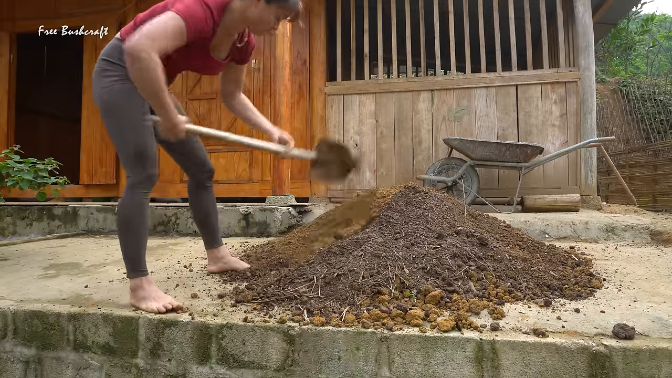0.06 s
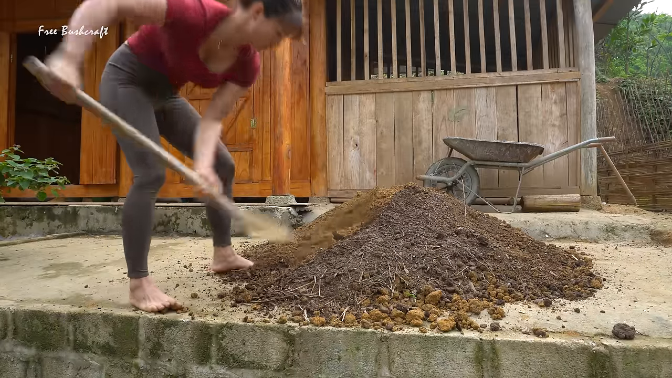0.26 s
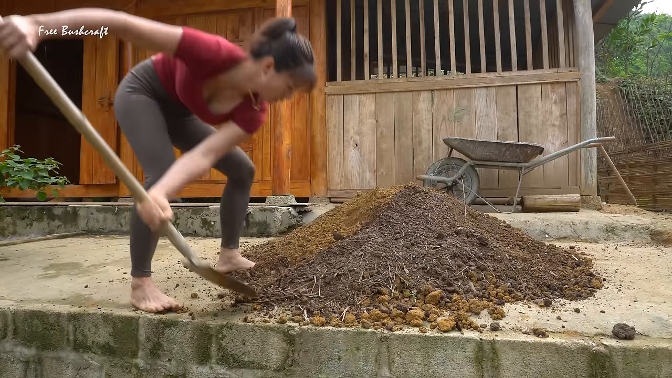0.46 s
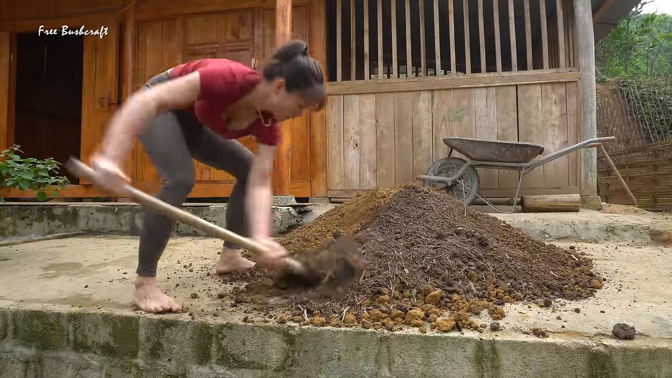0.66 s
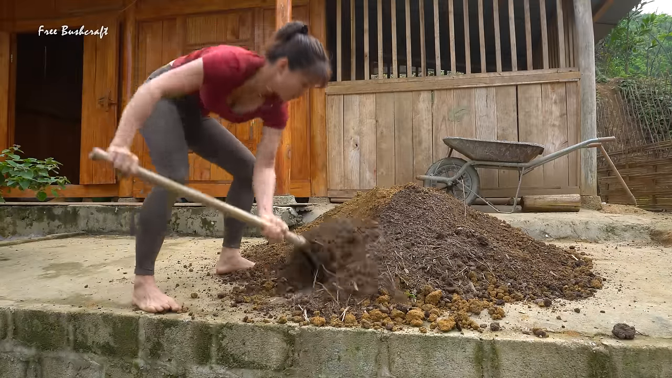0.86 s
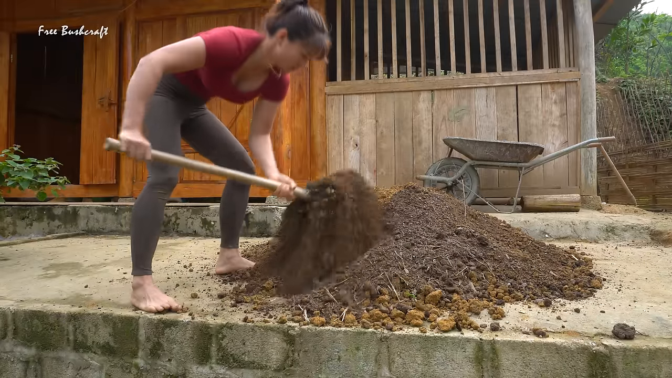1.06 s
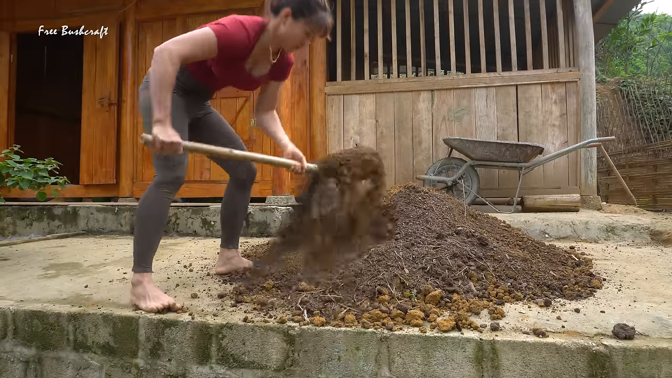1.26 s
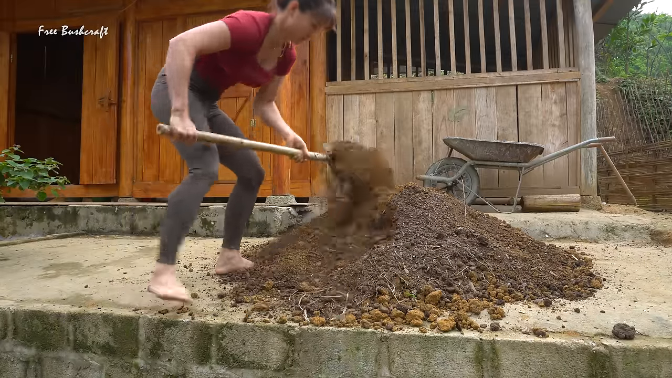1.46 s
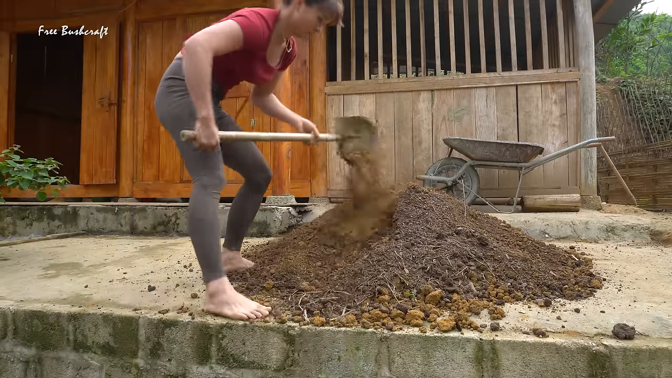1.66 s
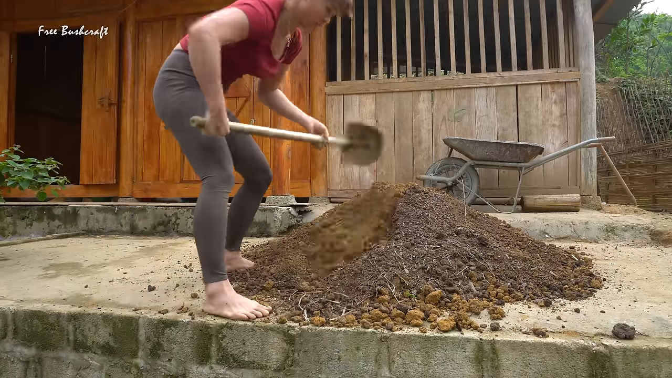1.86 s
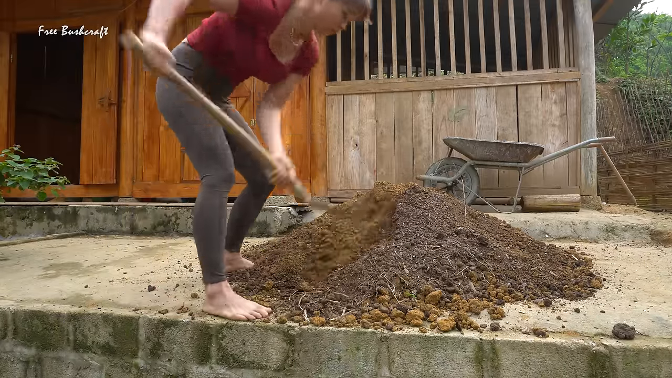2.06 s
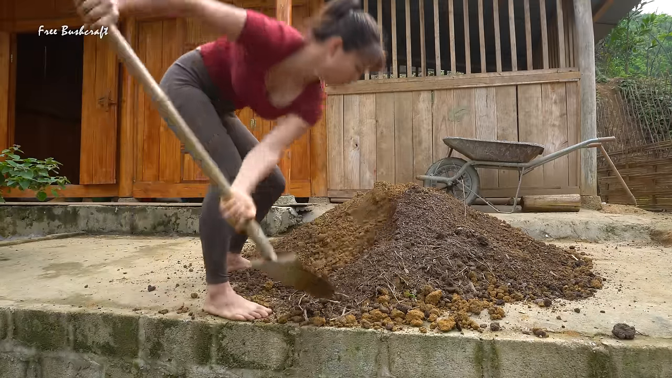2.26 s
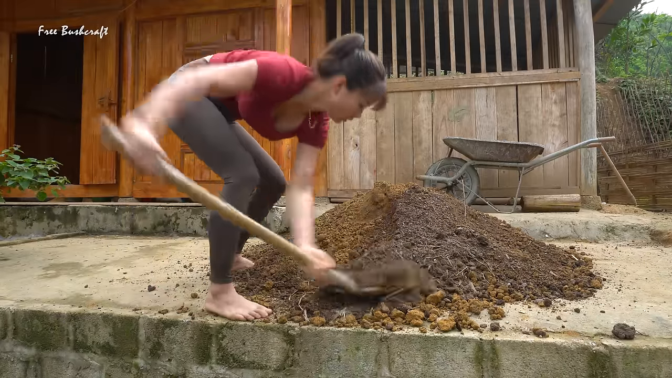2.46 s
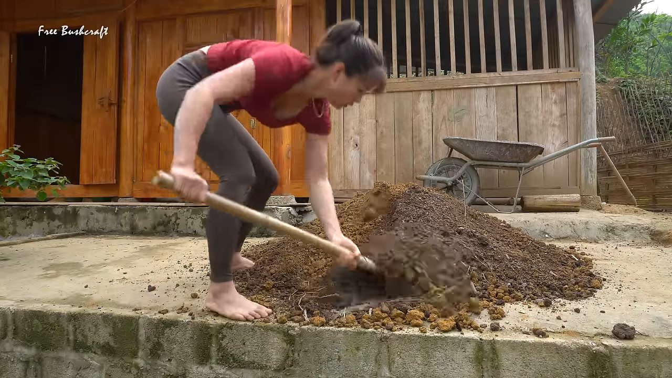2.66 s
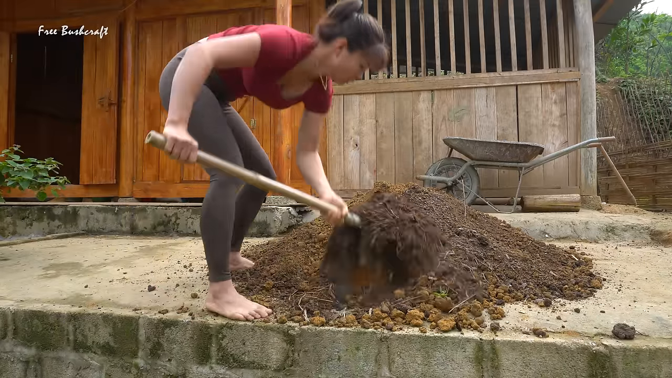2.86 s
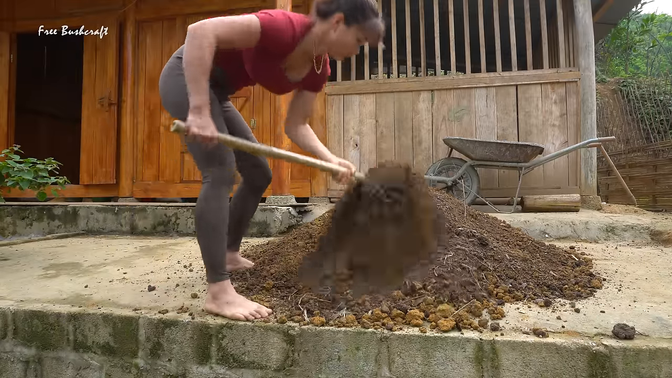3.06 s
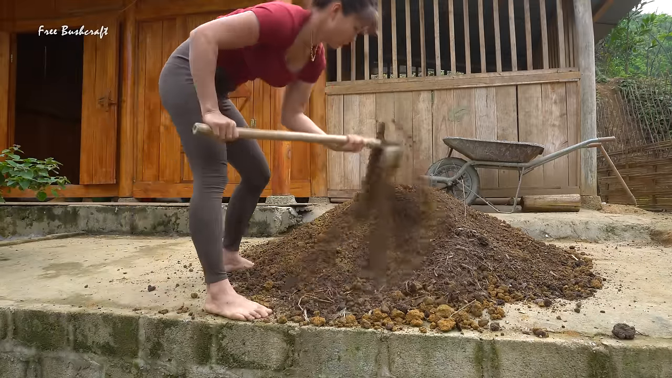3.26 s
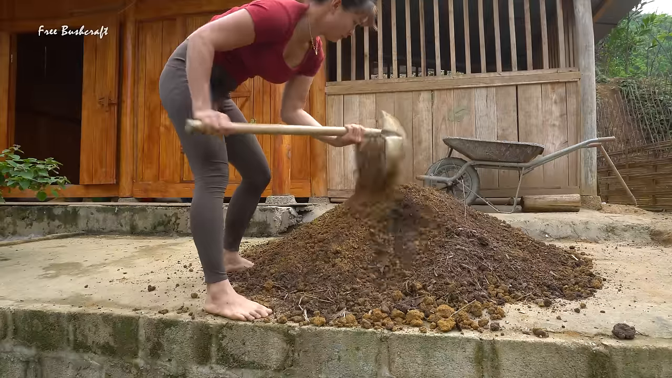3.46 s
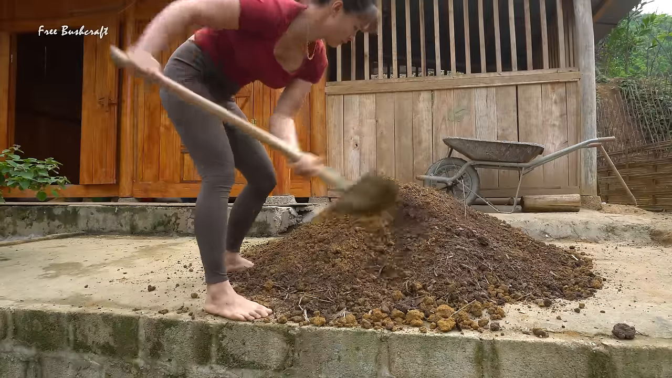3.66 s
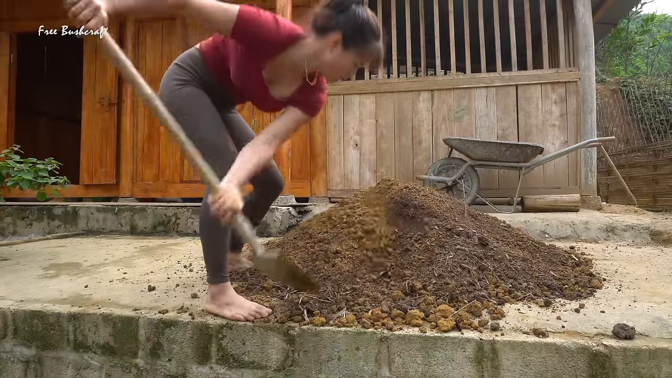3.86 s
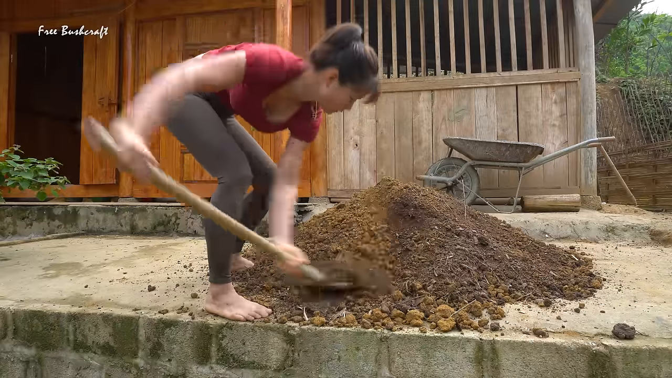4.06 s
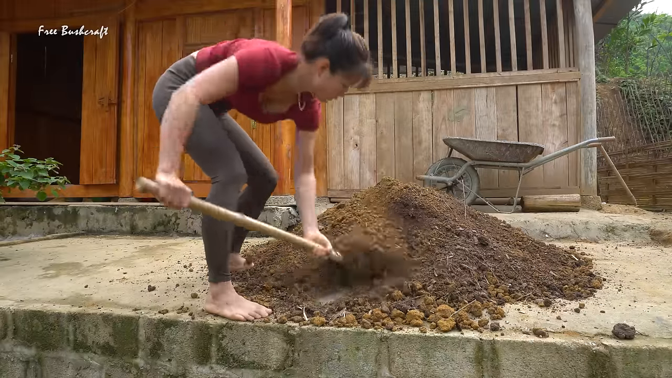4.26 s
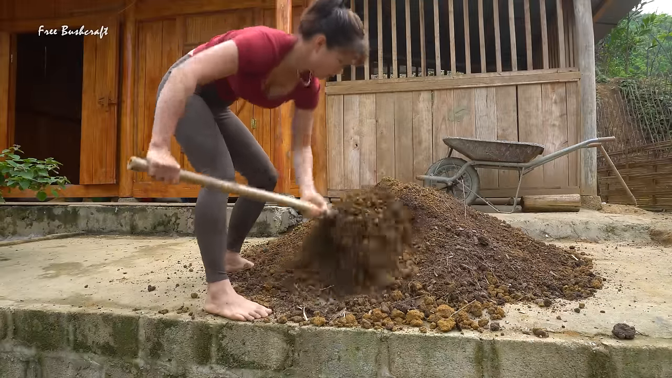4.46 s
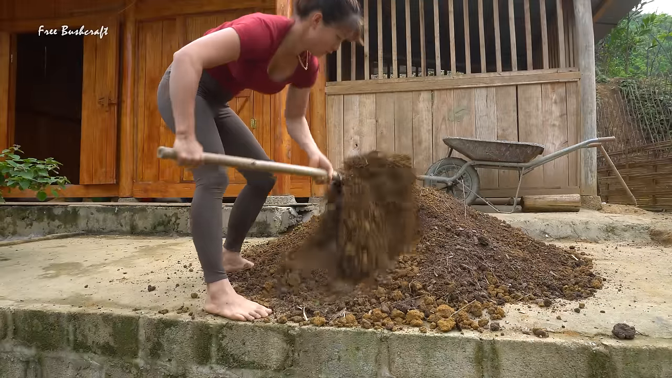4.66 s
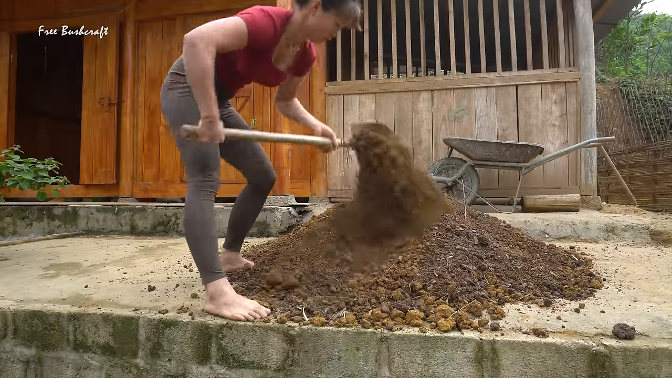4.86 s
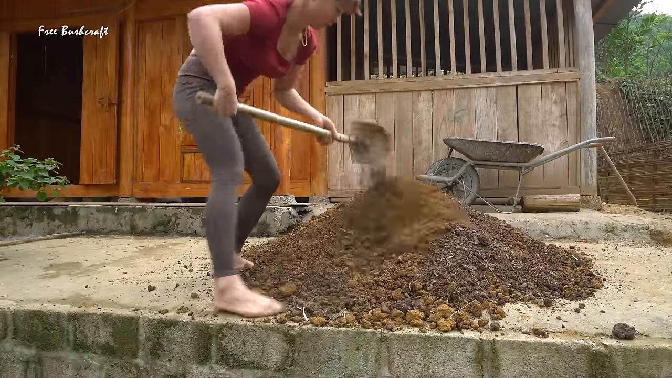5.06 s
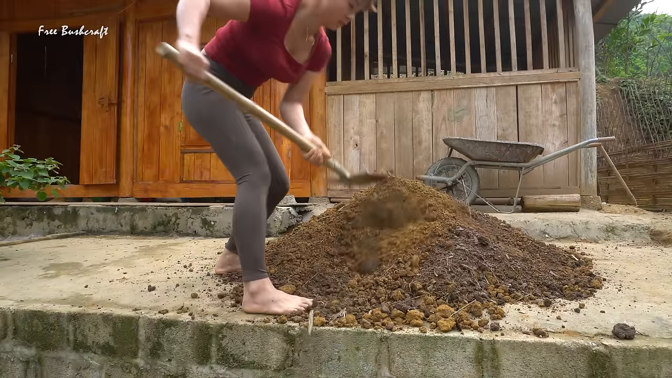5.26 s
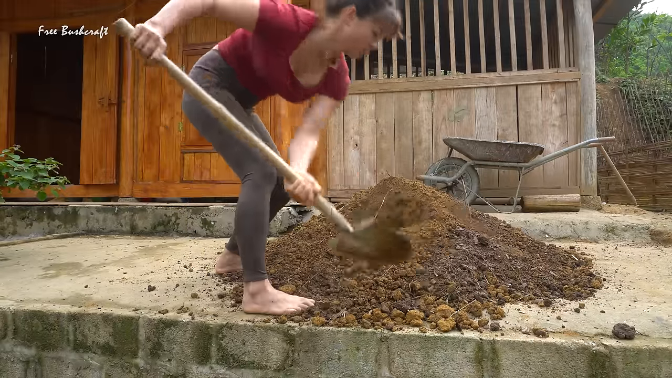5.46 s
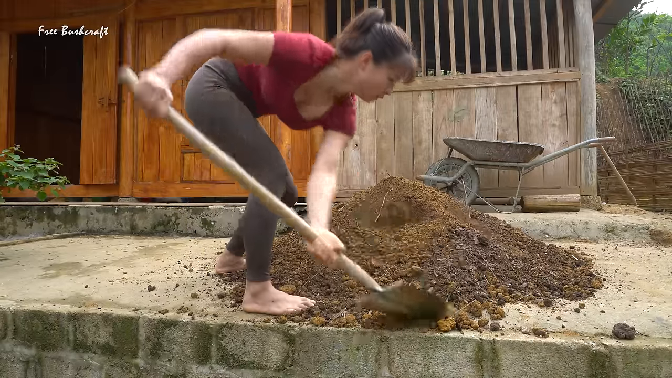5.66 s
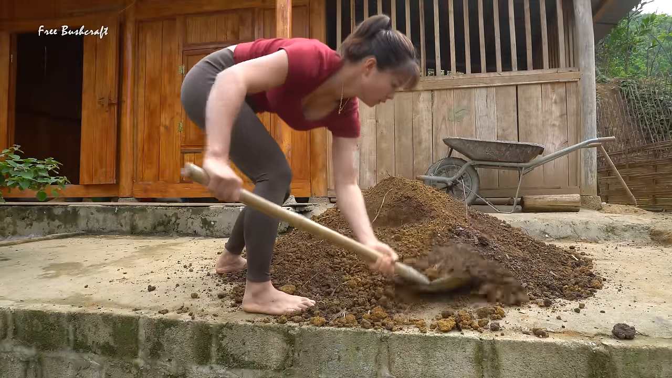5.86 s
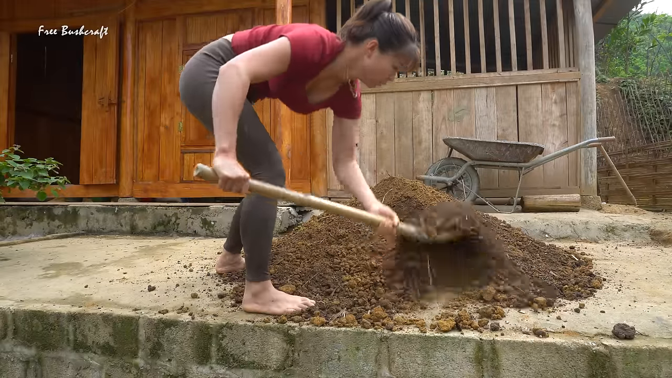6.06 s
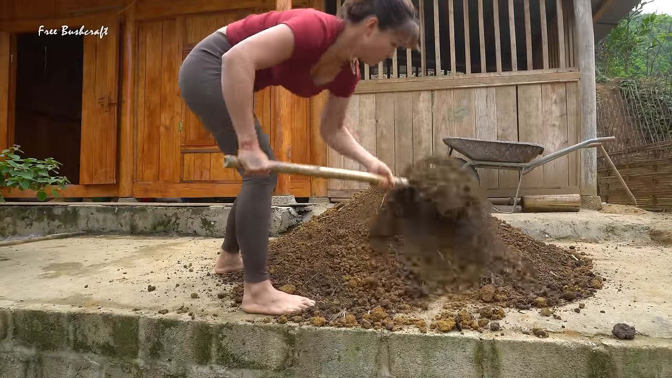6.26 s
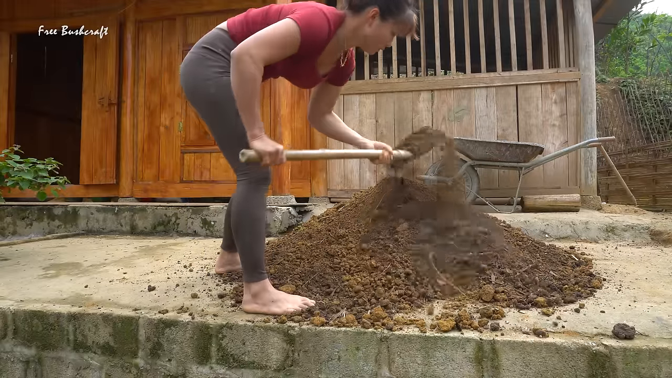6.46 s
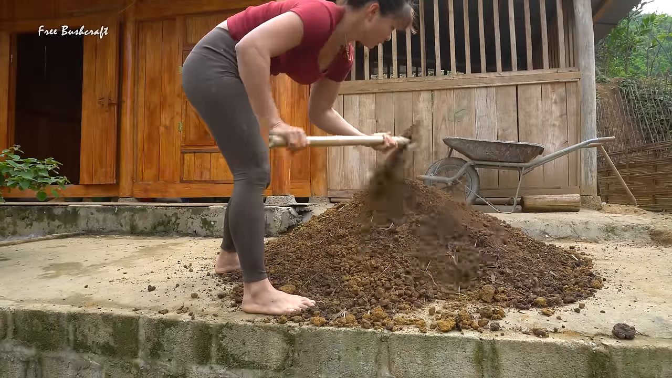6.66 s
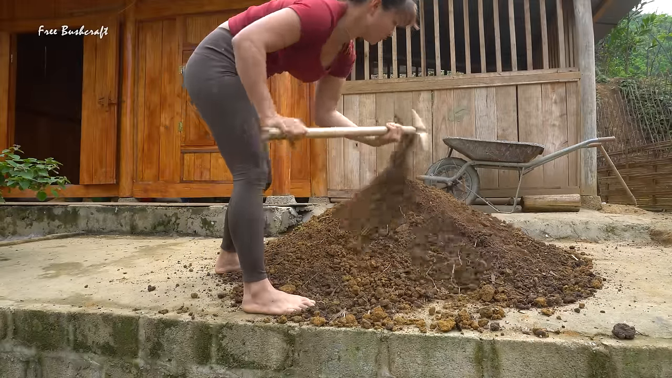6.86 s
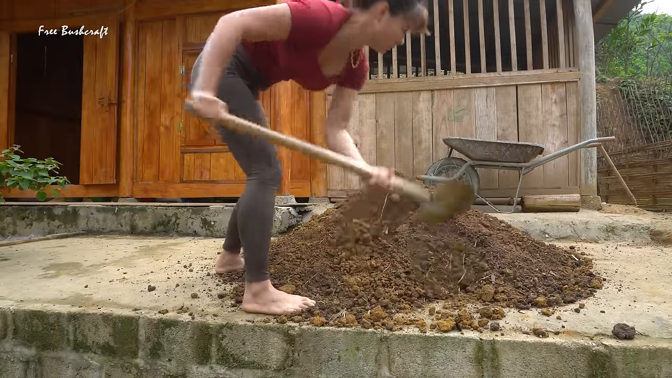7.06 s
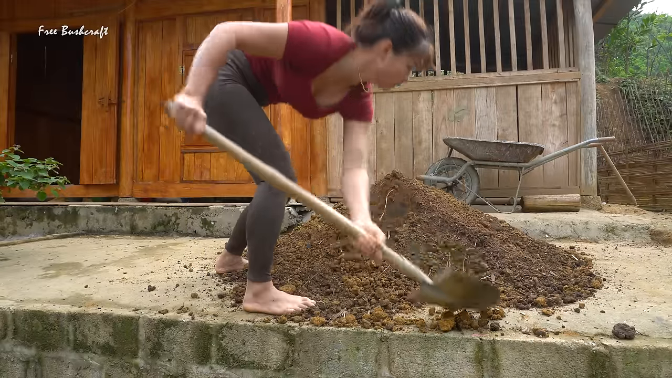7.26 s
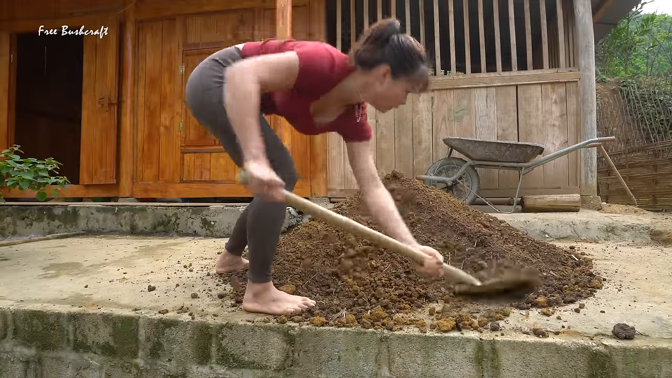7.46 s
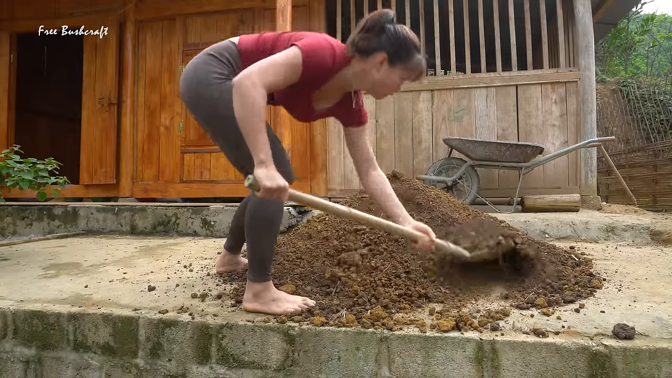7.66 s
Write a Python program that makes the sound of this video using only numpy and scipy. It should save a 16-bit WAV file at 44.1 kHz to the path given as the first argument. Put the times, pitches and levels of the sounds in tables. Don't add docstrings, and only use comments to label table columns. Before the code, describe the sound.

Five short gritty shovel scrapes on a concrete slab, with pebbles clicking and soil spilling, among birdsong, peeping chicks and soft hen clucks outdoors.

```python
import sys
import numpy as np
from scipy import signal
from scipy.fft import rfft, irfft, next_fast_len
from scipy.io import wavfile
from scipy.ndimage import uniform_filter1d, map_coordinates

SR = 44100
rng = np.random.default_rng(int(sys.argv[2]) if len(sys.argv) > 2 else 0)


def master_out(mix):
    frames = np.transpose(np.atleast_2d(mix))
    ceiling = np.clip(frames, -1, 1)
    pcm = np.round(ceiling * 32767).astype(np.int16)
    wavfile.write(sys.argv[1], SR, pcm)


def gain_from_decibels(decibels):
    exponent = np.asarray(decibels, float) / 20
    return 10 ** exponent


N = 340452


def unit(x):
    return x / np.sqrt(np.mean(x ** 2) + 1e-20)


def along(points, hz):
    f, v = np.transpose(points)
    return np.interp(np.log(hz + 1), np.log(f + 1), v)


def wobble(rate, size):
    knots = rng.standard_normal(int(size * rate / SR) + 4)
    return map_coordinates(knots, [np.arange(size) * rate / SR])


def filtered(x, response):
    m = next_fast_len(x.shape[-1] + 8192)
    spectrum = rfft(x, m) * response(np.fft.rfftfreq(m, 1 / SR))
    return irfft(spectrum, m)[..., :x.shape[-1]]


def band(x, lo_hz, hi_hz):
    return unit(filtered(x, lambda f: 1 / np.sqrt((1 + (lo_hz / (f + 1)) ** 8) * (1 + (f / hi_hz) ** 8))))


def spread(pair, alike):
    turn = lambda hz: np.arccos(np.clip(along(alike, hz), -1, 1)) / 2
    mid, side = filtered(pair, lambda hz: np.array([np.cos(turn(hz)), np.sin(turn(hz))]))
    return np.array([mid + side, mid - side])


def lean(db):
    return gain_from_decibels(np.multiply.outer([.5, -.5], np.atleast_1d(db)))


def add(out, s, x):
    part = out[..., round(s * SR):][..., :x.shape[-1]]
    part += x[..., :part.shape[-1]]


def crunch(size, share, spike_db):
    grains = (rng.random(size) < share) * gain_from_decibels(spike_db * np.minimum(rng.exponential(size=size), 3))
    return rng.standard_normal((2, size)) * (1 + grains)


def patches(x, wide, long, depth_db):
    z = signal.stft(x, nperseg=128)[2]
    field = uniform_filter1d(rng.standard_normal(z.shape[1:]), wide, axis=0)
    field = uniform_filter1d(field, long, axis=1)
    return signal.istft(z * gain_from_decibels(depth_db * unit(field)), nperseg=128)[1][:, :x.shape[-1]]


# [f/Hz, t60/s]
WALL_DECAY = [(300, 0.04), (3000, 0.31), (10000, 0.35)]


def walls(x, stretch):
    hz, t, z = signal.stft(rng.standard_normal((2, SR // 2)), SR, nperseg=256)
    t60 = stretch * along(WALL_DECAY, hz)[:, None]
    tail = signal.istft(z * gain_from_decibels(-60 * t / t60), SR, nperseg=256)[1]
    delayed = np.pad(x, (300, 0))[None]
    return signal.fftconvolve(delayed, tail / np.linalg.norm(tail[0]), axes=1)[:, :N]


# [t/s, level/dB]
AIR_STIR = [(0.0, -57), (1.61, -58.5), (2.49, -52), (2.66, -58), (3.14, -60.5), (4.21, -57.5),
            (4.56, -61.5), (5.76, -58.5), (5.89, -66), (6.06, -61.5), (6.47, -60.5), (7.72, -59.5)]
# [f/Hz, level/dB per Hz]
AIR_COLOUR = [(15, -40), (25, -7.5), (108, -3.5), (137, -7), (503, -6), (560, -7), (1160, -6.5),
              (1650, -7.5), (3520, -10), (4140, -10), (5880, -9.5), (12200, -7), (16000, -11)]
# [f/Hz, left-right likeness]
AIR_ALIKE = [(40, .995), (240, .97), (950, .7), (3800, .15), (15000, .15)]
# [f/Hz, left-right level/dB]
AIR_LEAN = [(100, 0), (950, 2.5), (3800, .5), (15000, 5)]
# [f/Hz, width/Hz, level/dB, from t/s, to t/s]
DRONES = [
    (558, 27, -68, 4.5, 8.3),
    (910, 30, -59, 0.5, .6),
]
# [t/s, f/Hz, level/dB]
MOTOR = [
    [(0.7, 112.3, -66), (3.92, 107.6, -68.5), (4.05, 101, -81)],
    [(5.1, 89, -73), (5.27, 106.7, -67.5), (5.8, 112.3, -68)],
]
SOIL_DB, SOIL_FOLLOWS = -53.5, 0.55
HISS_DB, HISS_FOLLOWS = -56, 0.44
SLIDE_DB, SLIDE_S = 10, 0.11


def yard():
    time = np.arange(N) / SR
    air_db = np.interp(time, *np.transpose(AIR_STIR))
    slides = sum(np.exp(-((time - enters) / SLIDE_S) ** 2) for _, _, enters, *_ in LOADS)
    soil_db = SOIL_DB + SOIL_FOLLOWS * (air_db + 59.5) + SLIDE_DB * slides
    hiss_db = HISS_DB + HISS_FOLLOWS * (air_db + 59)

    colour = lambda f: gain_from_decibels(along(AIR_COLOUR, f)) * lean(along(AIR_LEAN, f))
    raw = filtered(spread(crunch(N, share=.002, spike_db=4), AIR_ALIKE), colour)
    raw = patches(raw, 2, 30, depth_db=1.7)
    out = band(raw, 28, 1200) * gain_from_decibels(air_db + 1.5 + 1.3 * wobble(9, size=N))
    out += band(raw, 1680, 4330) * gain_from_decibels(soil_db + 0.79 * wobble(25, size=N))
    out += band(raw, 5000, 25500) * gain_from_decibels(hiss_db + 0.91 * wobble(24, size=N))

    for hz, width_hz, db, start, end in DRONES:
        size = round((end - start) * SR)
        hum = unit(filtered(rng.standard_normal(size), lambda f: 1 / (1 + ((f - hz) / width_hz) ** 2)))
        add(out, start, hum * gain_from_decibels(db + 3 * wobble(5, size=size)) * signal.windows.tukey(size, .3))
    for rows in MOTOR:
        s, hz, db = np.transpose(rows)
        t = np.arange(s[0], s[-1], 1 / SR)
        level = gain_from_decibels(np.interp(t, s, db) + 2.5 * wobble(6.6, size=len(t)))
        phase = 2 * np.pi * np.cumsum(np.interp(t, s, hz)) / SR
        add(out, s[0], np.sqrt(2) * level * signal.windows.tukey(len(t), .15) * np.sin(phase))
    return out


HOLLOWS = [555, 900, 1630, 1640, 1900]


def patter():
    out, t = np.zeros((2, N)), np.arange(SR // 8) / SR
    for when, pitch, big, side, life in rng.random((300, 5)):
        if life > .7:
            hz = HOLLOWS[int(pitch * len(HOLLOWS))] * (.98 + .04 * side)
        else:
            hz = 600 * 7 ** pitch
        decay = gain_from_decibels(-60 * t / (0.012 + 0.15 * life ** 3))
        ping = np.sin(2 * np.pi * hz * t) * decay * (1 - np.exp(-t / 0.002))
        add(out, when * N / SR, gain_from_decibels(-59 + 13 * big ** 2 - 6 * life) * ping * lean(8 * side - 3))
    return out


# [f/Hz, left-right likeness]
GRIT_ALIKE = [(60, 1), (600, 0.99), (1600, 1), (4000, 0.89), (8000, 0.66), (15000, 0.97)]
# [t/s, peak level/dB, knock f/Hz, sparkle level/dB re crack, left-right level/dB]
TICKS = [(0.14, -44, 2370, -14, 4), (0.156, -35.5, 2950, -23, -3), (0.164, -39, 2900, -17, -0.5),
         (0.2017, -30, 1970, -3, 7), (0.2545, -30.5, 1540, -22, 7), (1.206, -47, 3230, -23, -2.5),
         (1.4727, -29, 2970, -10, 2), (2.023, -34, 2050, -25, -8), (2.0732, -32.5, 1990, -18, -16),
         (2.131, -34, 3480, -5, -10), (2.2091, -32, 2100, -17, -4), (2.2202, -28, 2260, -20, -13),
         (2.228, -36, 3200, -17, -3), (2.2842, -36, 2230, -17, -10), (3.3354, -40, 1270, 3.5, 13),
         (3.3895, -39, 1870, -19, 10), (3.5065, -37, 1630, -14, 4.0), (3.7174, -35.5, 3910, -9, 1),
         (4.497, -51, 1630, -22, 13), (4.8265, -30.5, 2820, -5, 1), (4.8537, -50, 1400, -6, 5),
         (4.9098, -38.5, 2000, -9, 1.0), (5.0328, -34.5, 1480, -20, -4), (5.1518, -23.5, 3180, -6, 4),
         (5.4334, -40, 1360, -22, -9), (5.57, -53, 2920, 6, 15), (5.5822, -73, 2290, -12, 12),
         (5.697, -65, 1560, -8, 4), (5.707, -41, 2930, -9, -9), (5.7248, -41, 2730, 7, -4),
         (6.1894, -55, 2340, -14, 4), (6.5382, -29.5, 2800, -11, 2), (6.823, -26.5, 3090, -22, -1),
         (7.369, -23.5, 3260, -6, -1), (7.377, -27.5, 2080, -8, 3), (7.3958, -30, 3330, -4, -3)]
# [t/s, peak level/dB]
RINGS = [
    (0.2033, -31),
    (0.2542, -26.5),
    (5.1515, -29.5),
]
# [f/Hz, level/dB, time/s to fall by 75 dB]
EMPTY_BLADE = [(1540, 3, 0.28), (2040, 3, 0.24), (2480, 2, 0.1), (2950, -3, 0.077)]
# [t/s, peak level/dB, f/Hz]
THUDS = [(2.0287, -28, 3350), (2.074, -24.5, 1790), (2.13, -28, 553), (2.187, -16.5, 636),
         (2.209, -14, 290), (2.315, -25.5, 990), (3.3854, -31, 1700), (4.495, -34.5, 1530),
         (5.2743, -29, 1740), (6.104, -46, 918), (6.296, -30.5, 1900), (7.37, -31, 189)]
KNOCK_DB, KNOCK_GROWS = -45, 0.26


def stones():
    out, t = np.zeros((2, N)), np.arange(SR // 6) / SR
    for s, db, hz, sparkle_db, side_db in TICKS:
        knock_db = KNOCK_DB + KNOCK_GROWS * (db - KNOCK_DB) - db
        burst = spread(rng.standard_normal((2, len(t))), GRIT_ALIKE) * lean(side_db)
        crack = band(burst, 1460, 7100) + gain_from_decibels(sparkle_db) * band(burst, 10200, 14500)
        crack = crack * gain_from_decibels(-6.5 - 60 * t / 0.026)
        knock = band(burst, .88 * hz, 1.15 * hz) * gain_from_decibels(knock_db - 5 - 60 * t / .09)
        add(out, s, gain_from_decibels(db) * (crack + knock) * (1 - np.exp(-t / 0.0006)))
    for s, db in RINGS:
        ring = 0
        for hz, level, t60 in EMPTY_BLADE:
            strength = gain_from_decibels(level + 2.9 * wobble(67, size=len(t)) - 75 * t / t60)
            ring = ring + strength * np.sin(2 * np.pi * hz * t + 0.88 * wobble(117, size=len(t)))
        add(out, s, gain_from_decibels(db - 13) * ring * (1 - np.exp(-t / 0.00041)))
    for s, db, hz in THUDS:
        puff = band(rng.standard_normal(len(t)), 1.02 * hz, 1.08 * hz)
        add(out, s, gain_from_decibels(db - 10.0 - 60 * t / 0.08) * (1 - np.exp(-t / 0.0064)) * puff)
    return out


def whistle(hz, db, second_db, rough):
    unsteady_hz = hz * (1 + 0.037 * rough * wobble(421.6, size=len(hz)))
    phase = 2 * np.pi * np.cumsum(unsteady_hz) / SR
    octave = gain_from_decibels(second_db) * (hz / hz.max()) ** 3 * np.sin(2 * phase)
    return np.sqrt(2) * gain_from_decibels(db + 10.5 * rough * wobble(232, size=len(hz))) * (np.sin(phase) + octave)


def glides(rows, bend, second_db, rough, edge):
    out, ease = np.zeros(N), 0.41
    for s, length, start_hz, end_hz, db in rows:
        u = np.linspace(0, 1, round(length * SR))
        v = u + (4 * bend - 2) * u * (1 - u)
        hz = start_hz + (end_hz - start_hz) * (v - ease * np.sin(2 * np.pi * v) / (2 * np.pi))
        note = whistle(hz, db, second_db + (hz.mean() - 4600) / 60, rough)
        add(out, s, note * np.sin(np.pi * u ** 1.2) ** edge)
    return out


# [t/s, length/s, level/dB]
LEADS = [(0.249, 0.086, -49), (1.353, 0.085, -51), (1.737, 0.085, -47.5), (2.267, 0.069, -49),
         (2.932, 0.091, -54.5), (3.489, 0.05, -52), (3.799, 0.063, -45.5), (6.451, 0.092, -53),
         (7.654, 0.096, -55)]
# [t/s, length/s, start f/Hz, end f/Hz, level/dB]
PEEPS = [(0.335, 0.065, 3670, 2140, -36.5), (1.425, 0.065, 3875, 2684, -40), (1.81, 0.071, 3750, 2155, -38),
         (2.32, 0.066, 3960, 2360, -39.5), (2.985, 0.084, 3630, 2640, -45.5),
         (3.55, 0.071, 4320, 2280, -40.5), (3.845, 0.063, 3840, 1970, -34.5),
         (5.045, 0.12, 4550, 3900, -53), (5.045, 0.064, 4190, 3600, -51), (5.95, 0.063, 3190, 2630, -41),
         (6.04, 0.1, 4080, 2330, -48.5), (6.51, 0.069, 3910, 2210, -41.5), (7.665, 0.061, 4200, 3800, -49)]
LEAD_HZ, LEAD_SAG_HZ_PER_S = 4990, 8400


def peeps():
    leads = [(s, length, LEAD_HZ, LEAD_HZ - LEAD_SAG_HZ_PER_S * length, db) for s, length, db in LEADS]
    falls = glides(PEEPS, bend=.45, second_db=-9.0, rough=0.36, edge=0.4)
    return falls + glides(leads, bend=.6, second_db=-9.0, rough=0.36, edge=0.4)


# [t/s, length/s, start f/Hz, end f/Hz, level/dB]
FLICKS = [(0.36, 0.024, 5800, 7500, -50), (0.378, 0.016, 4840, 6300, -44.5),
          (0.395, 0.016, 5200, 6600, -48.5), (0.51, 0.023, 3780, 6300, -45), (3.755, 0.03, 5400, 6900, -49),
          (3.772, 0.025, 5400, 6900, -51), (3.835, 0.035, 7200, 6400, -55), (3.793, 0.016, 5100, 7050, -45),
          (3.812, 0.027, 5400, 7300, -45), (4.77, 0.072, 2600, 7370, -53.5), (5.18, 0.026, 6220, 5800, -52),
          (6.38, 0.034, 4930, 7450, -47)]


def far_bird():
    return glides(FLICKS, bend=0.48, second_db=-70, rough=0.23, edge=0.11)


# [t/s, level/dB]
STROKES = [
    [(0.586, -31), (0.592, -31), (0.618, -26), (0.634, -19), (0.688, -23), (0.734, -20.5), (0.746, -19),
     (0.79, -38), (0.87, -56)],
    [(2.444, -20), (2.446, -22.5), (2.62, -18), (2.634, -42), (2.652, -31), (2.66, -41), (2.71, -64),
     (2.72, -45)],
    [(4.027, -29), (4.043, -22), (4.085, -26), (4.115, -19), (4.137, -26), (4.145, -23.5), (4.175, -20.5),
     (4.181, -28.5), (4.3, -65)],
    [(5.762, -17), (5.772, -19.5), (5.912, -17.5), (5.922, -15), (5.932, -34), (5.94, -29), (5.95, -35),
     (5.968, -27.5), (6.03, -51.5)],
    [(7.43, -16.5), (7.452, -18.5), (7.536, -16.5), (7.55, -20), (7.56, -17.5), (7.582, -22), (7.6, -40),
     (7.656, -61), (7.69, -57)],
]
# [f/Hz, width/Hz, level/dB]
BARE_BLADE = [
    [(1016, 21, -6), (1365, 31, 5), (2210, 31, -5), (2870, 110, -10), (3280, 49, 1), (6200, 88, -7)],
    [(940, 21, 1), (1870, 33, 1.5), (3270, 90, 2.5), (5770, 120, -7), (6590, 38, -10), (7350, 240, -14)],
    [(1040, 20, -11), (1540, 25, -8), (2074, 55, 1.5), (3440, 160, 0.5), (5100, 29, -11), (7900, 71, -9)],
    [(1690, 51, -5), (2900, 39, 2), (4270, 40, -14), (4700, 120, -6), (6080, 80, -4), (7300, 96, -24)],
    [(1010, 38, -16), (1440, 140, -0.5), (2047, 32, 4), (2830, 23, 3), (3890, 47, -3), (4720, 58, -2)],
]
# [f/Hz, width/Hz, level/dB]
LOADED_BLADE = [
    [(1030, 110, -4), (1600, 52, 3), (1990, 71, 0.5), (4740, 180, -12), (6480, 140, 0), (7540, 54, -7)],
    [(1670, 110, -6), (1920, 32, -5), (2560, 130, -5), (3180, 84, -11), (6100, 38, -2), (6770, 45, -3)],
    [(920, 42, -15), (1600, 24, -9), (2050, 30, -3), (3090, 45, 3.5), (6200, 57, 2), (8100, 100, -2)],
    [(2140, 34, -1), (2820, 55, 0), (3270, 69, -9), (4280, 72, -6.5), (5700, 55, -10), (6450, 62, -18)],
    [(1600, 180, 0), (1954, 87, 1), (2930, 39, -2), (4720, 41, -11), (5000, 28, -17), (6440, 99, -14)],
]
# [f/Hz, width/Hz, level/dB]
SHAFT = [(272, 31, -29), (1008, 44, 2), (1530, 320, -13.5)]
FILLS = [0.675, 2.555, 4.105, 5.845, 7.495]
# [hiss left-right level/dB, left lead/rad at 8.1 kHz]
STROKE_LEAN = [(9, 0.9), (5, 0.028), (8, 0.5), (1, -0.62), (-1.5, -1.14)]
# [slab rumble level/dB re blade, grit hiss level/dB re blade,
# edge enters soil t/s, soil dulls by level/dB, sinks in/s, hiss top f/Hz]
LOADS = [(-6.5, 0, 0.727, 4, 0.021, 12600), (-3, 1.5, 2.57, 11.5, 0.022, 11700),
         (-4, 1, 4.17, 5.5, .03, 12200), (-9, 0.5, 5.83, 9.5, 0.099, 13000),
         (-15, -3.5, 7.55, 4.5, 0.024, 11900)]
# [f/Hz, level/dB per Hz]
GRIT = [(59, -68), (100, -34), (271, -9), (350, -22.5), (513, -3), (1100, -9), (2000, 1), (2580, -1),
        (3320, -1), (5300, -2.5), (10700, 4.5), (16000, 5)]
# [t/s, length/s, level/dB]
SKIMS = [
    (2.436, 0.0093, -27.5),
    (5.723, .043, -39.5),
    (7.394, 0.044, -44),
]
# [t/s, peak level/dB]
CATCHES = [(0.5921, -29), (0.6055, -5), (0.6304, -1), (0.7194, -8.5), (2.4455, 3), (2.5424, -15),
           (2.5584, 6), (2.5788, 8), (2.5946, -9), (2.6474, -15), (4.0372, 0.5), (4.0904, 0), (4.1097, 0),
           (4.144, -2), (4.1516, 5.5), (4.1594, 7.5), (4.1685, 8.5), (4.1924, -3.5), (5.7632, 6),
           (5.9144, -18), (5.9374, 0.5), (5.97, -1.5), (7.43, -2), (7.4994, -14), (7.5589, -6),
           (7.5762, -3), (0.668, 3), (0.7355, -7), (0.774, -6), (2.515, -14), (2.567, 1), (2.583, -2),
           (4.045, -4), (4.053, -6), (4.132, -3), (5.771, 2), (5.803, -4), (5.827, -6), (5.86, 7),
           (5.889, 5.5), (5.921, -11), (7.453, -4), (7.505, -11), (7.528, -6), (7.537, -5), (7.565, -12),
           (7.579, -7)]
FILL_S = 0.025
LIFTED_DB, PRESSED_DB = -40, -22
CATCH_KNOCK_DB, CATCH_SCATTER_DB = -19.5, 2.5


def driven(grains, modes):
    def response(f):
        ring = sum(gain_from_decibels(db) * 1j * f * w / (c * c - f * f + 1j * f * w) for c, w, db in modes + SHAFT)
        return gain_from_decibels(along(GRIT, f)) * (1 + gain_from_decibels(8) * ring)
    return unit(filtered(grains, response))


def scrape():
    out = np.zeros((2, N))
    strokes = zip(STROKES, BARE_BLADE, LOADED_BLADE, FILLS, STROKE_LEAN, LOADS)
    for stroke, bare, full, fills, (lean_db, lead), meets in strokes:
        slab_db, hiss_db, enters, dull_db, sink, top_hz = meets
        s, db = np.transpose(stroke)
        t = np.arange(s[0], s[-1], 1 / SR)
        blade_db = np.interp(t, s, db) - 2.5
        buried_db = dull_db * np.clip((t - enters) / sink, 0, 1)
        pressed = np.clip((blade_db - LIFTED_DB) / (PRESSED_DB - LIFTED_DB), 0, 1)

        grains = crunch(len(t), share=.02, spike_db=0.0)
        load = np.clip(.5 + (t - fills) / FILL_S, 0, 1)
        raw = spread((1 - load) * driven(grains, bare) + load * driven(grains, full), GRIT_ALIKE)
        raw = filtered(raw, lambda f: np.exp(1j * np.outer([.5, -.5], lead * f / 8100.0)))
        raw = patches(raw, 3, 14, depth_db=4.2)

        slip = .35 * wobble(90, size=len(t)) + 1.6 * wobble(330, size=len(t))
        blade = band(raw, 1190, 4380) * gain_from_decibels(blade_db + slip) * lean(0.41 * lean_db - 2.5)
        slab = band(raw, 184, 1020) * gain_from_decibels(blade_db + slab_db - pressed * buried_db + 0.2 * slip)
        hiss = band(raw, 3940, top_hz) * gain_from_decibels(blade_db + hiss_db - buried_db + slip) * lean(lean_db)
        add(out, s[0], (blade + slab + hiss) * (1 - np.exp((s[0] - t) / 0.0023)))
    for s, length, db in SKIMS:
        u = np.linspace(0, 1, round(length * SR))
        brush = spread(crunch(len(u), share=.01, spike_db=11), GRIT_ALIKE)
        add(out, s, band(brush, 570, 11000) * gain_from_decibels(db - 12 * (1 - u)))
    t = np.arange(SR // 20) / SR
    for s, db in CATCHES:
        burst = spread(rng.standard_normal((2, len(t))), GRIT_ALIKE)
        fade = gain_from_decibels(db - 18.5 - 60 * t / 0.023) + gain_from_decibels(db - 13 - 60 * t / 0.0034)
        crack = band(burst, 960, 11600) * fade * (1 - np.exp(-t / 0.00087))
        low_db = CATCH_KNOCK_DB + CATCH_SCATTER_DB * rng.normal()
        add(out, s, crack + band(burst, 210, 1700) * gain_from_decibels(db + low_db - 21.0 - 60 * t / 0.053))
    return out


# [t/s, f/Hz, level/dB]
HIGH = [(0, 6054, -17), (.012, 6950, -4.5), (.038, 5550, -1.5), (.059, 6630, 3), (.09, 5064, -3),
        (.097, 4910, -11.5), (.104, 4480, 0.5), (.13, 3650, -2), (.142, 3130, -29)]
# [t/s, f/Hz, level/dB]
LOW = [(0, 3690, -12), (.006, 3733, 1), (.017, 3490, 2.5), (.022, 3135, -12), (.028, 2774, -13),
       (.042, 3385, -3), (.052, 3530, 6), (.06, 3300, -3.5), (.068, 2900, -8)]
# [t/s, f/Hz, level/dB]
HOOK = [(-.005, 3370, -5), (0, 4120, -1.5), (.004, 4600, -9), (.012, 4600, -4)]
# [t/s, level/dB]
HIGH_AT = [(0.964, -49), (1.406, -43), (1.84, -39.5), (2.277, -39), (2.721, -44.5), (3.162, -44),
           (3.606, -43), (6.342, -49), (6.779, -44.5), (7.209, -42), (7.65, -45)]
# [t/s, level/dB]
LOW_AT = [(1.228, -48), (1.665, -45), (2.098, -44), (2.984, -50), (3.426, -47), (6.605, -47.5),
          (7.035, -47)]


def songbird():
    out = np.zeros(N)
    for shape, times in ((HIGH, HIGH_AT), (LOW, LOW_AT), (HOOK, LOW_AT)):
        s, hz, level = np.transpose(shape)
        t = np.arange(s[0], s[-1], 1 / SR)
        track = uniform_filter1d(np.interp(t, s, hz), size=len(t) // 14, mode="nearest")
        for start, db in times:
            note = whistle(track, db + np.interp(t, s, level), second_db=-43, rough=0.18)
            add(out, start + s[0], note)
    return out


# [t/s, peak level/dB, f/Hz]
CLUCKS = [(1.568, -41, 570), (4.68, -50, 610), (5.121, -44, 552), (5.255, -40, 572), (6.024, -37, 592),
          (6.492, -43, 562), (6.622, -39.5, 601), (6.902, -45, 590), (7.265, -43, 550)]


def hen():
    out, u = np.zeros(N), np.linspace(0, 1, round(0.03 * SR))
    for s, db, hz in CLUCKS:
        cluck = whistle(hz * (1 + 0.0067 * u), db - 10.5, second_db=-33, rough=0.098)
        add(out, s, cluck * np.sin(np.pi * u))
    return out


# [t/s, length/s, start f/Hz, end f/Hz, level/dB]
NEAR_PEEP = [
    (5.11, 0.14, 3566, 2750, -39.5),
]


def bold_chick():
    return glides(NEAR_PEEP, bend=0.58, second_db=-20, rough=0.42, edge=0.44)


def scene():
    shovel = scrape() + stones()
    song, flicks, chicks, bold = songbird(), far_bird(), peeps(), bold_chick()
    near = shovel + gain_from_decibels(-16.5) * walls(shovel.mean(0), stretch=0.61) + patter()
    left = chicks * lean(19) * gain_from_decibels(-8.5) + gain_from_decibels(2.0) * walls(chicks, stretch=0.91) * lean(4.4)
    left = left + hen() * lean(1.3)
    left = left + bold * lean(13) + gain_from_decibels(-2.5) * walls(bold, stretch=0.85) * lean(4)
    right = (song + gain_from_decibels(-5.5) * flicks) * lean(-12.0)
    right = right + gain_from_decibels(-1.5) * walls(song + gain_from_decibels(3.5) * flicks, stretch=0.85) * lean(1)
    return near + left + right + yard()


def roll_off(x):
    return signal.sosfilt(signal.butter(12, 16650, fs=SR, output="sos"), x)


def record(dry):
    soft = dry / (1 + np.abs(dry / .72) ** 8) ** (1 / 8)
    mix = filtered(soft, lambda f: f < 15950)
    return roll_off(mix)


dry = scene()
out = record(dry)
master_out(out)
```